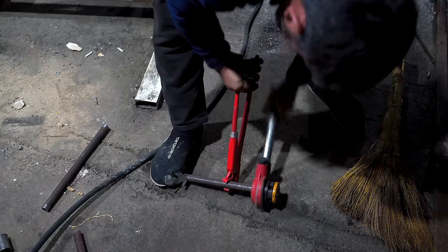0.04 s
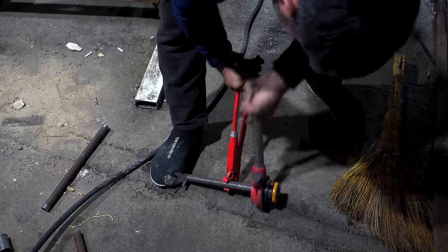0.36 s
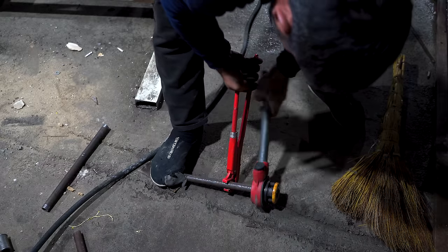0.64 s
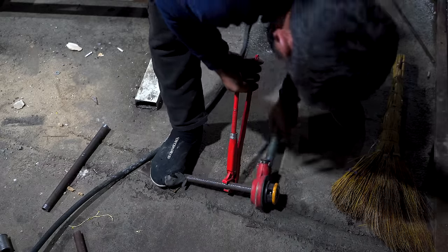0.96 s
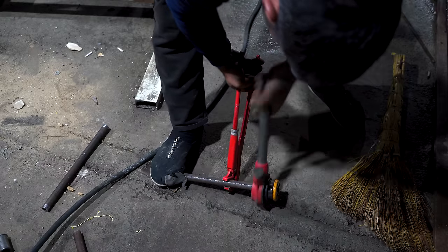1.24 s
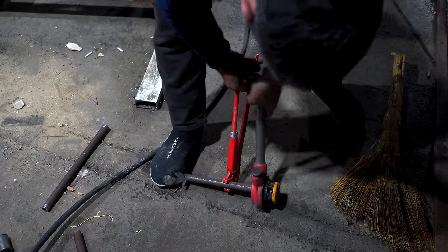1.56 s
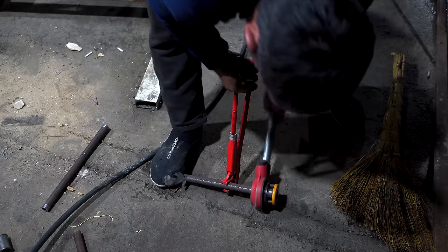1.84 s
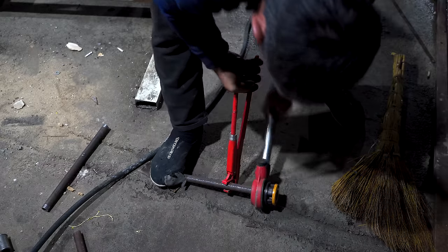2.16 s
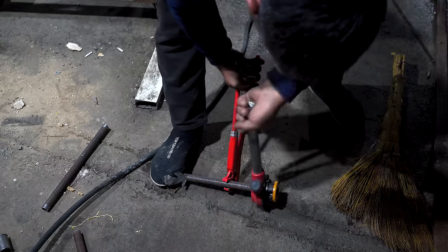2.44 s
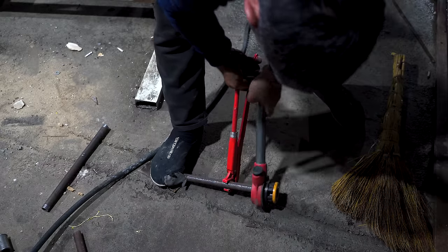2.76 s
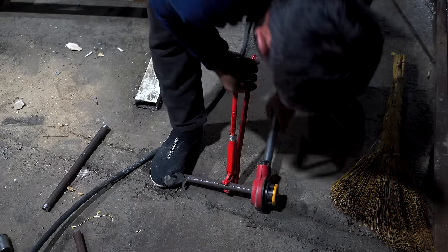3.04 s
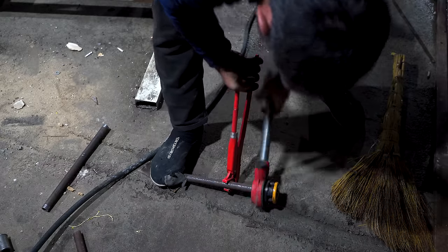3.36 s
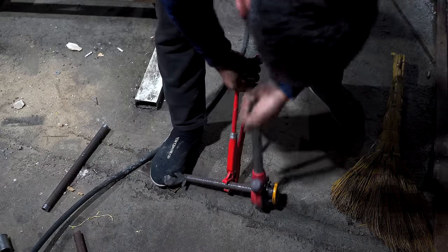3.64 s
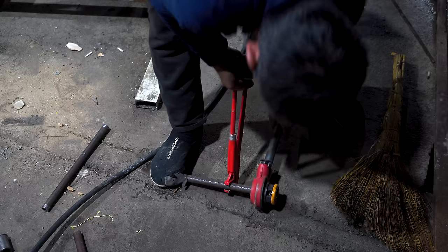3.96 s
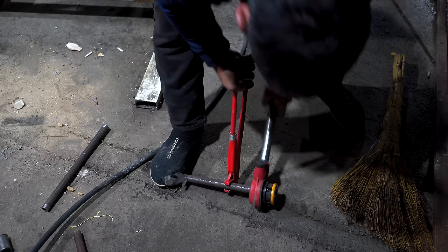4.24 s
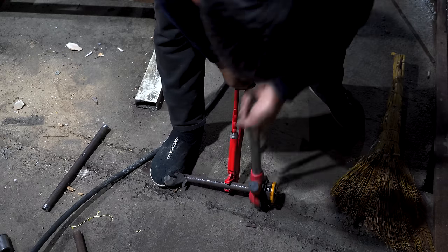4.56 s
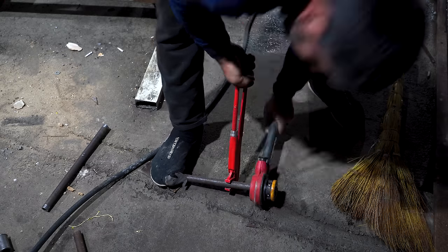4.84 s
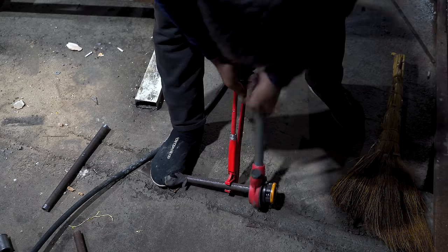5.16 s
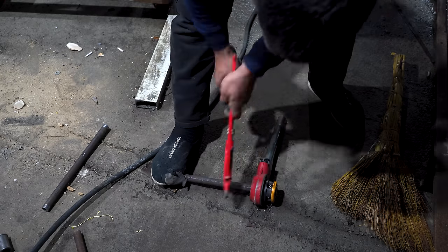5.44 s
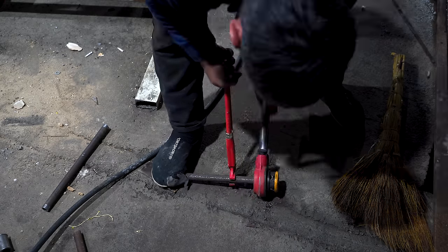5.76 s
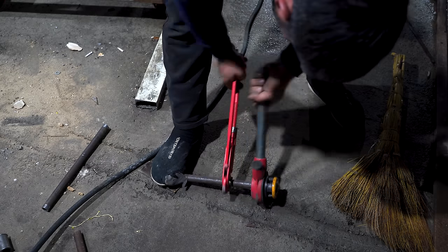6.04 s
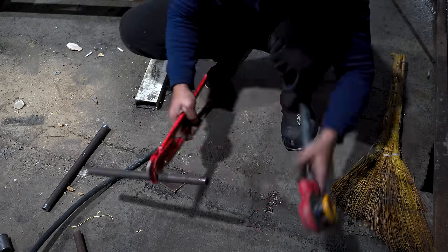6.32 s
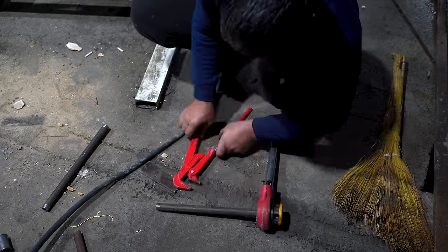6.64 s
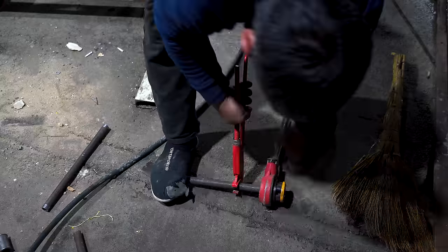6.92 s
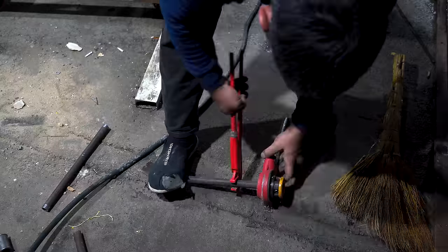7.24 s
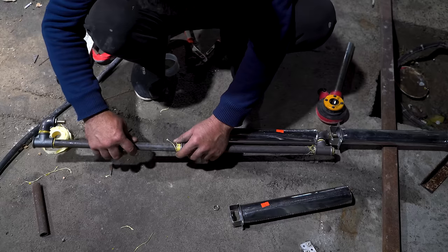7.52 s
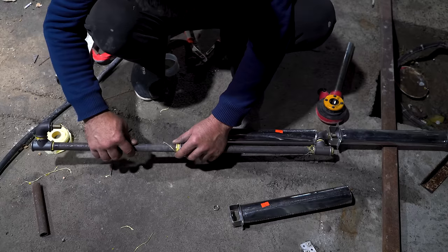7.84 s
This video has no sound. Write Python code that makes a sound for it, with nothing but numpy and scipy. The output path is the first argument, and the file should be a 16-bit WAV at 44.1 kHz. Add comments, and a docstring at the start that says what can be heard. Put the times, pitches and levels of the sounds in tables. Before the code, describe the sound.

A hand ratchet threader works a steel pipe, clicking sharply three times on each return swing, with handle knocks and faint scraping between. After four swings the sound speeds up into thin hiss, rapid fluttering clicks, small squeaks and bright tool clinks. Normal speed returns and a pipe lands on concrete with a brief ring. It is heard from nearby in a slightly reverberant workshop with a low rumble.

```python
"""Sharp ratchet clicks, three to a return swing, over workshop rumble and a thin whine: a hand threader
cuts a steel pipe. The pawl drops over the teeth, the handle knocks as it takes up the load, the dies shave.
Then the work races by in fast-forward: the rumble turns to hiss, the strokes to a flutter, and tools clink
and tick as they are gathered. At normal speed again, a pipe is set down."""
import sys
import numpy as np
from scipy import signal
from scipy.fft import rfft, irfft, next_fast_len
from scipy.io import wavfile

SR = 44100
rng = np.random.default_rng(int(sys.argv[2]) if len(sys.argv) > 2 else 0)


def wrap_up_sound(samples):
    """Save the sound to the file named by the first command line argument, as 16-bit audio."""
    columns = np.atleast_2d(samples).T
    # keep every value between -1 and 1, then stretch to whole-number steps
    tamed = np.clip(columns, -1, 1)
    steps = np.round(tamed * 32767).astype(np.int16)
    wavfile.write(sys.argv[1], SR, steps)


N = 347949
TIME = np.arange(N) / SR
FAST_FROM_S, FAST_TO_S = 3.741, 7.338


def amp(db):
    """Decibels to gain."""
    return 10 ** (np.asarray(db) / 20)


def add(track, start_s, sound):
    """Mix a sound in at start_s."""
    i = int(np.clip(start_s * SR, 0, N - 1))
    track[i:i + len(sound)] += sound[:N - i]


def colour(x, outline):
    """Filter by a (freq_hz, gain_db) outline; rms 1."""
    hz, db = np.transpose(outline)
    size = next_fast_len(len(x))
    freq_hz = np.maximum(np.fft.rfftfreq(size, 1 / SR), 1)
    gain = amp(np.interp(np.log(freq_hz), np.log(hz), db))
    shaped = irfft(rfft(x, size) * gain, size)[:len(x)]
    return shaped / np.sqrt(np.mean(shaped ** 2))


def drift(rate_hz):
    """Bounded random drift, spread near 1."""
    knots = rng.uniform(-2, 2, 8192)
    return np.interp(TIME * rate_hz, np.arange(len(knots)), knots)


def burst(x, db, span_s):
    """Scale x to the energy of span_s of sound at level db."""
    return x / np.linalg.norm(x) * np.sqrt(span_s * SR) * amp(db)


def contact(chatter_ms, rattle):
    """A first impact, then the faces chatter briefly against each other."""
    t = np.arange(2048) / SR
    chatter = rng.standard_normal(len(t)) ** 3 * np.exp(-(1000 * t / chatter_ms) ** 2)
    push = rattle * chatter / np.linalg.norm(chatter)
    push[0] += 1
    return push


def ring(push, modes, db, detune=0.013, scatter_db=1.76):
    """Damped modes driven by a push; each blow lands differently and favours other modes."""
    t = np.arange(4096) / SR
    hz, width_hz, gain_db = np.transpose(modes)[:, :, None]
    chance = rng.standard_normal((len(modes), 2))
    detuned_hz = hz * (1 + detune * chance[:, :1])
    waves = np.exp(-np.pi * width_hz * t) * np.sin(2 * np.pi * detuned_hz * t)
    waves = signal.fftconvolve(waves, push[None], axes=1)[:, :len(t)]
    waves /= np.linalg.norm(waves, axis=1, keepdims=True)
    polarity = (-1) ** np.arange(len(modes))[:, None]
    weights = polarity * amp(gain_db + scatter_db * chance[:, 1:])
    return burst(np.sum(weights * waves, axis=0), db, span_s=0.005)


def rubbing(strokes, outline, grain_db, uneven_db, sharpness):
    """Steel on steel: dense micro-slips that swell and fade with each stroke."""
    slips = rng.standard_normal(N) * amp(grain_db * drift(800))
    speed = np.zeros(N)
    for start_s, end_s, db in strokes:
        progress = np.clip((TIME - start_s) / (end_s - start_s), 0, 1)
        speed += amp(db) * np.abs(np.sin(np.pi * progress)) ** sharpness
    return colour(slips, outline) * speed * amp(uneven_db * drift(50))


def pings(start_s, end_s, low_hz, high_hz, width_hz, db, count):
    """Faint pings, thickest mid-span and mostly low in their range."""
    out = np.zeros(N)
    for a, b, pitch in rng.random((count, 3)):
        hz = low_hz * (high_hz / low_hz) ** (pitch ** 2)
        ping = ring(contact(8.4, rattle=1.8), [(hz, width_hz, 0)], db)
        add(out, start_s + (end_s - start_s) * (a + b) / 2, ping)
    return out


def noise_bed(outline, modes, db, waver_db):
    """Steady noise with a few resonances; the level wavers a little."""
    freq_hz = np.fft.rfftfreq(N, 1 / SR)
    lift_db = sum(peak_db / (1 + (2 * (freq_hz - hz) / width_hz) ** 2) for hz, width_hz, peak_db in modes)
    noise = irfft(rfft(rng.standard_normal(N)) * amp(lift_db), N)
    return colour(noise, outline) * amp(db + waver_db * drift(9))


def tone(hz, db, wander, flicker_db):
    """A sine, unsteady in pitch and level."""
    phase = 2 * np.pi * np.cumsum(hz * (1 + wander * drift(70))) / SR
    return np.sqrt(2) * np.sin(phase) * amp(db + flicker_db * drift(3.8))


def highpass(x, order, cutoff_hz):
    """Butterworth bass cut."""
    return signal.sosfilt(signal.butter(order, cutoff_hz, "high", fs=SR, output="sos"), x)


# rumble spectra before and after the fast-forward: freq_hz, gain_db
RUMBLE_EARLY = [(20, -6), (60, -0.5), (150, 1), (250, -5), (550, -5), (800, -9), (1200, -18.5), (2600, -25),
                (3600, -32), (5000, -36), (6500, -43), (11000, -41), (16000, -62.5)]
RUMBLE_LATE = [(20, -4), (90, 1), (160, -4.5), (270, -8.5), (420, -0.5), (580, -1.5), (850, -8),
               (1300, -21), (2700, -24.5), (3700, -37.5), (4800, -34), (6000, -45.5), (11000, -46.5),
               (16000, -57)]
# rumble resonances: freq_hz, width_hz, lift_db
RUMBLE_MODES = [(155.5, 11, 3.5), (343, 11, 6.5), (428, 17, 2), (507, 11, 3), (625, 13, 3.5),
                (1750, 60, 6.5)]


def rumble():
    """Low room noise, slightly louder after the fast-forward."""
    early = noise_bed(RUMBLE_EARLY, RUMBLE_MODES, db=-50, waver_db=-0.5)
    late = noise_bed(RUMBLE_LATE, RUMBLE_MODES[:4], db=-48, waver_db=0.1)
    return np.where(TIME < FAST_FROM_S, early, late)


# whine before and after the fast-forward: pitch_hz, level_db
WHINE_TONES = [(2735, -69), (2810, -64.3)]


def whine():
    """A distant whine, with a weaker, higher companion before the fast-forward."""
    early, late = (tone(hz, db, wander=0.012, flicker_db=2.4) * amp(1.4 * drift(45))
                   for hz, db in WHINE_TONES)
    companion = tone(hz=4735, db=-80.5, wander=0.0073, flicker_db=1) * amp(2.8 * drift(40))
    return np.where(TIME < FAST_FROM_S, early + companion, late)


# hiss spectrum: freq_hz, gain_db
HISS_SPECTRUM = [(100, -37), (200, -25.5), (400, -14.5), (620, -6), (850, -1.5), (1300, -1.5), (2000, -2),
                 (2450, 4), (3400, 1.5), (6100, -1.5), (8400, -1.5), (11000, 0), (15700, 1), (16100, -21)]
# hiss resonances: freq_hz, width_hz, lift_db
HISS_PEAKS = [(848, 48, 6.1), (1760, 180, 6.7), (2430, 210, 3), (3270, 100, 2.4), (5110, 91, 10),
              (6320, 300, 7), (11400, 370, 3)]
# hiss envelope: time_s, level_db
HISS_ENVELOPE = [(3.8, -54), (4.37, -54.5), (5.32, -55), (5.5, -54.5), (6.45, -55.5), (6.94, -55),
                 (7.19, -54.5), (7.3, -54)]


def hiss():
    """Sped-up rumble: bright noise with a fine crackle."""
    noise = noise_bed(HISS_SPECTRUM, HISS_PEAKS, db=0.26, waver_db=-0.5)
    level_db = np.interp(TIME, *np.transpose(HISS_ENVELOPE))
    crackle_db = drift(600)
    return noise * amp(level_db + crackle_db)


# workshop reverberation bands: freq_hz, decay_s, gain_db
REVERB_BANDS = [(298, 0.35, 1.5), (930, 0.2, -8), (2253, 0.26, -6), (4570, 0.24, -7.5), (7960, 0.28, -8.5),
                (11000, 0.19, -10.5), (15000, 0.16, -13.5)]


def reverb(x, build_s=0.00047, t60_per_decay=0.88):
    """Wall reflections build quickly; the bass lingers longest."""
    t = np.arange(32768) / SR
    hz, decay_s, db = np.transpose(REVERB_BANDS)
    log_freq = np.log(np.maximum(np.fft.rfftfreq(len(t), 1 / SR), 1))
    noise = rfft(rng.standard_normal(len(t)))
    onset = 1 - np.exp(-(t / build_s) ** 2)
    response = np.zeros(len(t))
    for selector, t60_s, gain in zip(np.eye(len(hz)), decay_s * t60_per_decay, amp(db)):
        band = irfft(noise * np.interp(log_freq, np.log(hz), selector))
        envelope = onset * amp(-60 * t / t60_s)
        response += gain * band * envelope / np.linalg.norm(envelope)
    return signal.fftconvolve(x, response)[:N]


# fast-forward squeaks: start_s, end_s, from_hz, to_hz, level_db
SQUEAKS = [(4.82, 5.02, 1930, 1750, -67), (4.72, 4.805, 4600, 4210, -62), (6.31, 6.552, 11000, 15000, -61),
           (6.71, 7.003, 2840, 2370, -68), (6.869, 6.99, 4440, 5840, -65), (6.922, 7.0, 11600, 12400, -54),
           (6.934, 6.947, 5700, 5860, -49), (7.204, 7.312, 5500, 4360, -63),
           (7.275, 7.336, 5270, 6640, -61.5)]


def squeaks(wander=0.014, scratch_db=5.5):
    """Thin, scratchy tones that slide up or down and break up."""
    out = np.zeros(N)
    wobble = 1 + wander * drift(900)
    for start_s, end_s, from_hz, to_hz, db in SQUEAKS:
        span = (TIME > start_s) & (TIME < end_s)
        progress = np.linspace(0, 1, span.sum())
        hz = (from_hz + (to_hz - from_hz) * progress) * wobble[span]
        envelope = amp(db) * np.sqrt(np.abs(np.sin(np.pi * progress)))
        add(out, start_s, envelope * np.sin(2 * np.pi * np.cumsum(hz) / SR))
    return out * amp(scratch_db * drift(110))


# spells of sped-up cranking: start_s, end_s, stroke_rate_hz, level_db
CRANKING_SPELLS = [(3.75, 4.04, 29.6, -47), (4.049, 4.51, 25.05, -48.5), (4.612, 4.74, 26.2, -49),
                   (4.786, 4.95, 28.5, -49), (5.001, 5.09, 26.3, -48), (5.117, 5.4, 15.8, -50.5)]
# spectrum of sped-up strokes and scuffs: freq_hz, gain_db
FAST_SPECTRUM = [(200, -52), (700, -24.5), (2400, -7.5), (4000, 0.5), (6200, 0.5), (8500, -2.5), (10200, 2),
                 (12300, -1.5), (16000, -4)]


def flutter(width_s=0.0082, grain_db=5, trim_db=-4.5, uneven_db=2):
    """Each sped-up stroke is a puff of tiny clicks; the rate is steady within a spell."""
    grains = colour(rng.standard_normal(N) * amp(grain_db * drift(650)), FAST_SPECTRUM)
    t = np.arange(-1024, 1024) / SR
    puff = np.exp(-(t / width_s) ** 2 / 2)
    envelope = np.zeros(N)
    for start_s, end_s, rate_hz, db in CRANKING_SPELLS:
        for centre_s in np.arange(start_s, end_s, 1 / rate_hz):
            add(envelope, centre_s + t[0], puff * amp(db + trim_db))
    return grains * envelope * amp(uneven_db * drift(25))


# sped-up tool drags: start_s, end_s, level_db
TOOL_DRAGS = [(5.595, 5.635, -50.5), (5.805, 5.835, -51), (6.07, 6.22, -47)]


def scuffs():
    """Tools scrape as they are dragged and gathered."""
    return rubbing(TOOL_DRAGS, FAST_SPECTRUM, grain_db=11, uneven_db=3, sharpness=0.38)


# low and middle tool resonances: freq_hz, width_hz, gain_db
TOOL_LOW_MODES = [(1385, 22, -3.5), (1864, 33, 0.5), (3580, 320, 4)]
TOOL_MID_MODES = [(6040, 450, 5), (7970, 1350, 4), (9930, 520, 4)]
# high tool resonances: freq_per_pitch, width_per_pitch, gain_db
TOOL_HIGH_RATIOS = [(.88, 0.18, -5), (1, 0.27, 0.5), (1.12, .09, -5.5)]


def strike_tools(blows, feed, crack_db=-6):
    """A toneless crack over three groups of resonances; a bright blow favours the high group."""
    out = np.zeros(N)
    for start_s, strength_db, bright_db, hz in blows:
        push = contact(chatter_ms=1.8, rattle=1.4)
        groups = TOOL_LOW_MODES, TOOL_MID_MODES, np.array(TOOL_HIGH_RATIOS) * [hz, hz, 1]
        for modes, (db, share) in zip(groups, feed):
            add(out, start_s, ring(push, modes, strength_db + db + share * bright_db))
        crack = highpass(push, order=1, cutoff_hz=2500)
        add(out, start_s, burst(crack, strength_db - bright_db / 2 + crack_db, span_s=0.003))
    return out


# sped-up ticks and clinks: start_s, strength_db, bright_db, pitch_hz
DRY_TICKS = [(5.4588, -40.5, 2.5, 13100), (5.6524, -44, -7.5, 14500), (5.755, -37.5, 3.5, 13000),
             (6.0986, -41.5, -3.5, 12900), (6.4285, -43.5, 1, 14200), (6.474, -42, 2.5, 13800),
             (6.5679, -32, 7, 14900), (6.703, -38.5, 5, 13300), (6.8363, -44, 6.5, 12900),
             (6.8622, -45, 6, 12500), (6.935, -42, 4, 13000), (6.9798, -40.5, 1, 12100),
             (7.006, -44, 0, 13400), (7.0576, -45, 4.5, 12400), (7.1144, -46.5, 8, 11600),
             (7.1521, -45, 11.5, 12200), (7.328, -39.5, 3.5, 12600)]
TOOL_CLINKS = [(5.6114, -47.5, -7, 14200), (6.136, -47, -5, 13200), (6.166, -37.5, -3, 13700),
               (6.1886, -44.5, -1, 14000), (6.326, -36.5, 4, 12800), (6.5745, -32.5, 9, 13900)]
# their coupling to the low, middle and high resonances: gain_db, bright_share
TICK_COUPLING = [(-15, -.8), (-1.5, -0.88), (-0.5, 1)]
CLINK_COUPLING = [(-5, -0.52), (0.5, -1), (0.5, 0.93)]


def ticks_and_clinks(from_s=5.45, to_s=7.2, rate_hz=13, patter_db=-51, spread_db=3.5, pitch_hz=13100):
    """Handling and steps tick over a fainter patter; steel tools knock together and ring."""
    chance = rng.uniform(-1, 1, (64, 3))
    patter = [(slot_s + jitter / rate_hz / 2, patter_db + spread_db * size, spread_db * tilt, pitch_hz)
              for slot_s, (jitter, size, tilt) in zip(np.arange(from_s, to_s, 1 / rate_hz), chance)]
    return strike_tools(DRY_TICKS + patter, TICK_COUPLING) + strike_tools(TOOL_CLINKS, CLINK_COUPLING)


# floor bumps, higher in fast-forward: start_s, level_db, pitch_hz
FLOOR_BUMPS = [(.452, -39, 320), (1.328, -38, 323), (1.498, -54, 278), (2.395, -38, 300), (2.63, -35, 380),
               (4.011, -54, 750), (5.0993, -29.5, 1080), (5.2498, -44, 814), (6.98, -57, 600)]
# bump resonances: freq_per_pitch, width_per_pitch, gain_db
BUMP_RATIOS = [(0.801, 0.34, 3), (1.15, 0.34, 5), (1.6, 0.12, -7.5), (2.4, 0.44, -2.5), (3, 0.27, -27.5)]


def pipe_bumps():
    """The pipe bumps the floor: dull blows with hardly any ring."""
    out = np.zeros(N)
    for start_s, db, hz in FLOOR_BUMPS:
        modes = np.array(BUMP_RATIOS) * [hz, hz, 1]
        add(out, start_s, ring(contact(chatter_ms=5.8, rattle=0.62), modes, db))
    return out


# pipe landings: start_s, level_db, chatter_ms
PIPE_LANDINGS = [(7.459, -43, 14), (7.47, -53, 8.4), (7.7142, -22.5, 8.8), (7.7234, -28, 13.6)]
# pipe resonances: freq_hz, width_hz, gain_db
PIPE_MODES = [(454, 83, -14.5), (734, 49, -6), (875, 25, 4), (1050, 270, -2), (1292, 370, -5),
              (1616, 30, -11.5), (1883, 97, -7), (2640, 620, -15), (3390, 430, -15.5), (5960, 14000, -25.5)]


def pipe_set_down():
    """A long pipe lands on concrete and rings briefly."""
    out = np.zeros(N)
    for start_s, db, chatter_ms in PIPE_LANDINGS:
        add(out, start_s, ring(contact(chatter_ms, rattle=5.7), PIPE_MODES, db, detune=0.0017))
    return out


# cutting strokes: start_s, end_s, level_db
CUT_STROKES = [(0.592, 1.015, -61), (1.602, 2.085, -63.5), (2.718, 3.203, -66.5)]
# shaving spectrum, with a low creak and a thin squeak: freq_hz, gain_db
CUT_SPECTRUM = [(900, -13.5), (1550, 5.5), (1830, 12.5), (2300, 7.5), (4600, -1), (5100, 4.5), (5600, -3.5),
                (7300, -3.5), (9500, -1.5), (12500, -9.5), (16000, -11)]


def cutting_dies():
    """The dies scrape under load while chips snap off with tiny pings."""
    chips = sum(pings(start_s, end_s, low_hz=5200, high_hz=13400, width_hz=120, db=db - 8, count=14)
                for start_s, end_s, db in CUT_STROKES)
    scrape = rubbing(CUT_STROKES, CUT_SPECTRUM, grain_db=5, uneven_db=-2.5, sharpness=1.8)
    return chips + scrape * amp(-1.5)


# return swings: start_s, end_s, level_db
RETURN_SWINGS = [(.08, .52, -52.5), (1.12, 1.62, -50), (2.17, 2.70, -49.5), (3.29, 3.76, -49)]
# spectrum of the pawl on the teeth: freq_hz, gain_db
PAWL_RUB_SPECTRUM = [(200, -6.5), (450, 3.5), (1100, -2), (2400, -0.5), (3300, -5.5), (4400, -12.5),
                     (8000, -23.5), (16000, -24)]


def pawl_rub():
    """The pawl rides over the teeth through each return swing."""
    return rubbing(RETURN_SWINGS, PAWL_RUB_SPECTRUM, grain_db=5, uneven_db=3, sharpness=0.34) * amp(-5.5)


def pawl_climb(drops, db=-39, rise_s=0.0074, grain_db=4):
    """The pawl climbs each tooth with a growing scrape that ends as it drops."""
    envelope = sum(np.exp(-np.abs(TIME - drop_s) / rise_s) * (TIME < drop_s) for drop_s, *_ in drops)
    slips = rng.standard_normal(N) * amp(grain_db * drift(700))
    return colour(slips, PAWL_RUB_SPECTRUM) * envelope * amp(db)


# resonances of the threader's parts: freq_hz, width_hz, gain_db
PIPE_HANDLE_MODES = [(450, 270, -6), (657, 170, -3.5), (1015, 410, -4), (1337, 320, -2)]
HOUSING_MODES = [(1760, 213, -4.5), (2255, 184, -2), (2610, 120, -3), (2847, 200, -6.5)]
DIE_HEAD_MODES = [(3686, 500, -4), (4140, 250, 0.5), (4936, 600, -2), (5500, 880, -3.5), (6710, 340, -6.5),
                  (7566, 260, -5), (8470, 460, -17.5)]
PAWL_MODES = [(9620, 200, 1.5), (10350, 180, -3)]
PAWL_TIP_MODES = [(11150, 730, -5.5), (12600, 700, -4.5), (14020, 540, -7.5), (14800, 260, 0.5)]


def strike_threader(blows, feed, rattle, crack_db=-5, die_head_db_per_ms=-1.26):
    """Each blow rings all five parts; a bright one favours the small parts."""
    out = np.zeros(N)
    parts = PIPE_HANDLE_MODES, HOUSING_MODES, DIE_HEAD_MODES, PAWL_MODES, PAWL_TIP_MODES
    crack_band = signal.butter(1, [1200, 12000], "band", fs=SR, output="sos")
    for start_s, strength_db, bright_db, chatter_ms in blows:
        push = contact(chatter_ms, rattle)
        levels_db = [strength_db + db + share * bright_db for db, share in feed]
        levels_db[2] += die_head_db_per_ms * chatter_ms  # a clean snap rings the die head most
        for modes, db in zip(parts, levels_db):
            add(out, start_s, ring(push, modes, db))
        crack = signal.sosfilt(crack_band, push)  # radiated by the contact itself
        add(out, start_s, burst(crack, np.mean(levels_db[2:]) + crack_db, span_s=0.0027))
    return out


# pawl drops, three to a return swing: start_s, strength_db, bright_db, chatter_ms
PAWL_DROPS = [(0.1376, -25.5, -2, 2.5), (0.21, -21.5, 1.5, 2.6), (0.2925, -26, -0.5, 1.3),
              (1.2084, -23.5, 1, 1.6), (1.2853, -23.5, -3.5, 6), (1.383, -26, 3, 1.4),
              (2.2793, -25, 0.5, 1.74), (2.3658, -25.5, 3, 4.2), (2.4738, -24.5, -2, 3.5),
              (3.4108, -23.5, 3, 4.5), (3.5058, -25, -1.5, 2.6), (3.5845, -27, -1.5, 1.16)]
# play in the handle as the swing turns: start_s, strength_db, bright_db
HANDLE_KNOCKS = [(0.0288, -40.5, -2.5), (0.0387, -42, 5), (0.4401, -40, -1), (0.4534, -37, 0),
                 (0.4657, -33, 2), (1.0777, -42, -6.5), (1.5341, -44, 13.5), (1.5621, -27.5, 5.5),
                 (2.1639, -42.5, -6), (2.1916, -44, 9), (2.5887, -44.5, -9), (2.6284, -32.5, 1),
                 (3.3021, -40, -2), (3.3276, -48.5, 11), (3.4934, -34, 1.5)]
# their coupling to pipe and handle, housing, die head, pawl, tip: gain_db, bright_share
DROP_COUPLING = [(-9, 0.16), (1, -1), (3, 0), (-3, 1.6), (-2.5, 0.48)]
KNOCK_COUPLING = [(-1, -0.9), (0.5, 0), (-8, .7), (-22.5, 1), (-21.5, 1)]


def ratchet(settle_s=0.027, settle_spread_s=0.005, settle_db=-16, knock_chatter_ms=2.4):
    """The pawl snaps down, the loose head settles after each drop, and the handle knocks more dully."""
    settles = [(drop_s + settle_s + settle_spread_s * rng.standard_normal(), db + settle_db, 0)
               for drop_s, db, *_ in PAWL_DROPS]
    soft_blows = [(*blow, knock_chatter_ms) for blow in HANDLE_KNOCKS + settles]
    knocks = strike_threader(soft_blows, KNOCK_COUPLING, rattle=1.64)
    knocks = signal.sosfilt(signal.butter(2, 13500, fs=SR, output="sos"), knocks)
    snaps = strike_threader(PAWL_DROPS, DROP_COUPLING, rattle=3.2)
    return snaps + knocks * amp(-2.5)


def normal_speed():
    """Threading and pipe handling in the reverberant workshop."""
    work = pawl_climb(PAWL_DROPS) + pipe_bumps() + pipe_set_down() + cutting_dies() + pawl_rub()
    # the tool radiates another mix of modes in each direction, so the walls return a smoother blend
    reflections = (reverb(ratchet() + work) + reverb(ratchet() + work)) / np.sqrt(2)
    return rumble() + whine() + reflections + work + ratchet()


def fast_forward(hum_end_s=4.8):
    """Sped-up work: hiss, a brief hum, squeaks, fluttering strokes, scuffs, pops and clatter."""
    hum = tone(hz=712, db=-76, wander=0.006, flicker_db=1.2) * (TIME < hum_end_s)
    faint_pings = pings(4.5, 6.0, low_hz=760, high_hz=3460, width_hz=160, db=-59, count=30)
    # speeding up lifts the bass limit too
    pops = highpass(pipe_bumps(), order=1, cutoff_hz=450)
    clatter = highpass(ticks_and_clinks() + faint_pings, order=2, cutoff_hz=800)
    return hiss() + hum + squeaks() + flutter() + scuffs() + pops + clatter


def scene():
    """Normal speed, a cut to fast-forward, and a cut back; mono."""
    fast = (TIME > FAST_FROM_S) & (TIME < FAST_TO_S)
    normal = normal_speed()
    return np.where(fast, fast_forward(), normal)[None]


def record(dry):
    """Steep cut of the highest treble."""
    cutoff_hz = 15900
    return signal.sosfilt(signal.ellip(8, 0.2, 70, cutoff_hz, fs=SR, output="sos"), dry)


dry = scene()
out = record(dry)
wrap_up_sound(out)
```